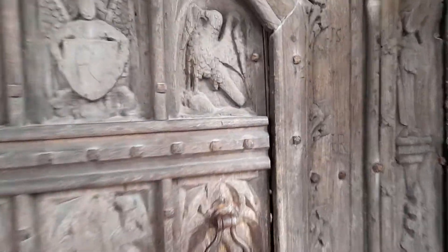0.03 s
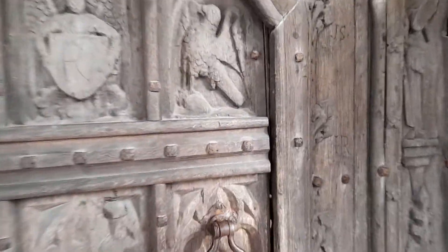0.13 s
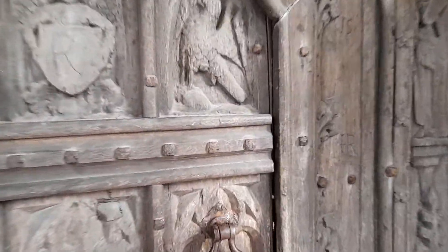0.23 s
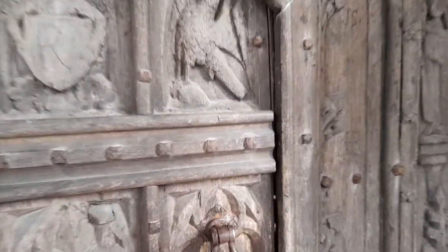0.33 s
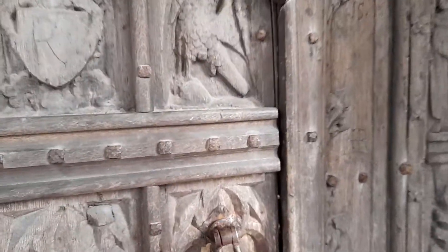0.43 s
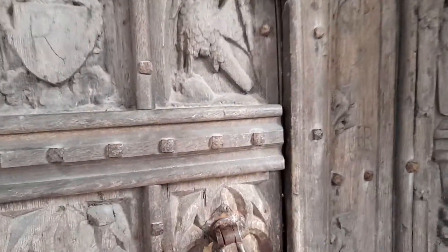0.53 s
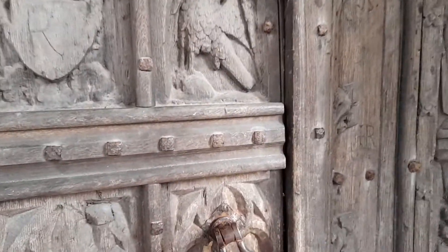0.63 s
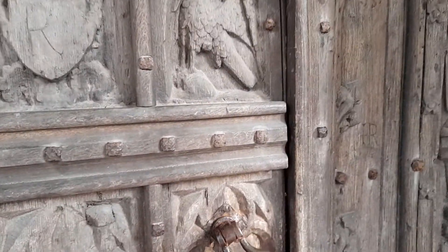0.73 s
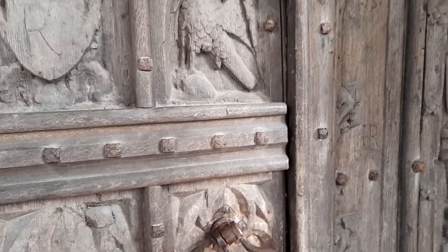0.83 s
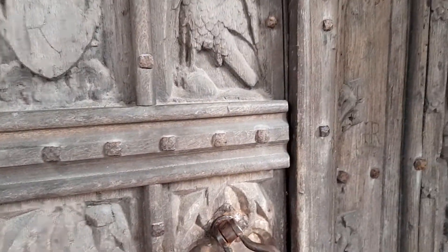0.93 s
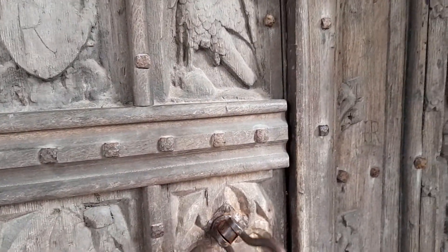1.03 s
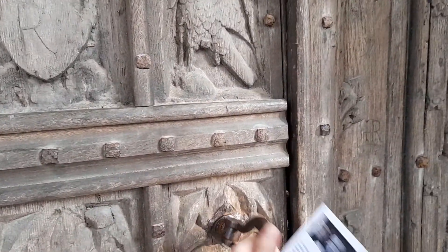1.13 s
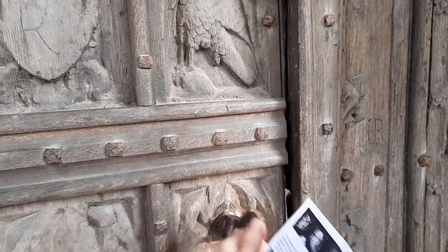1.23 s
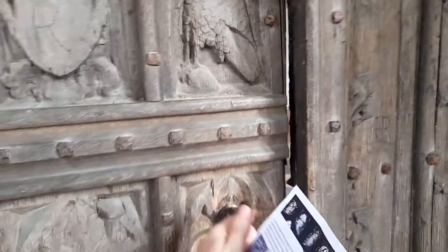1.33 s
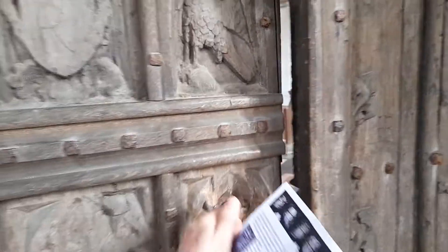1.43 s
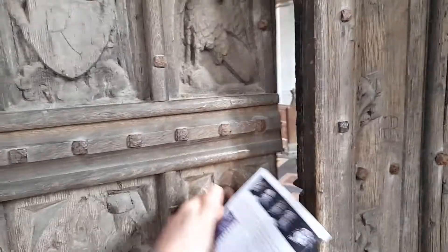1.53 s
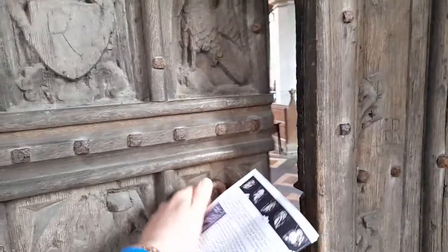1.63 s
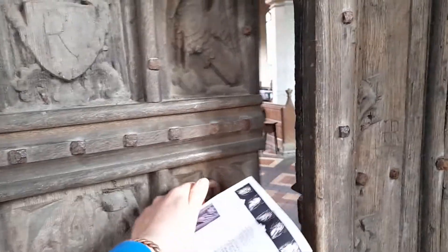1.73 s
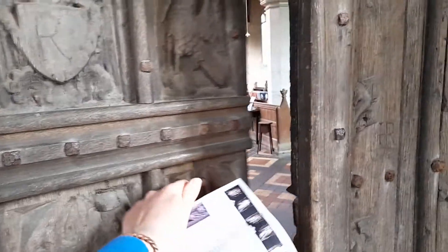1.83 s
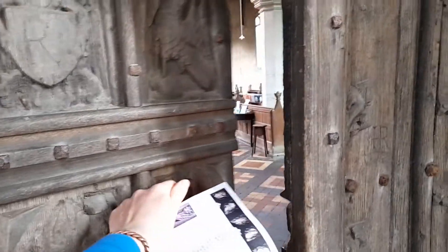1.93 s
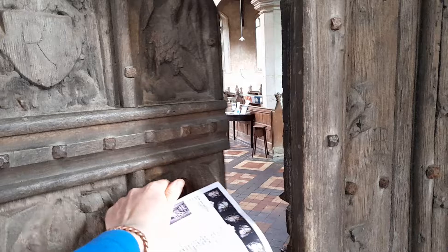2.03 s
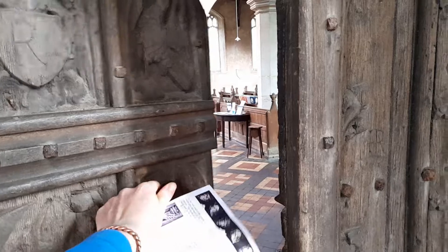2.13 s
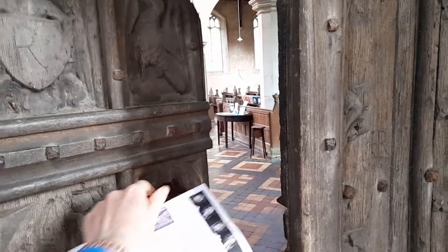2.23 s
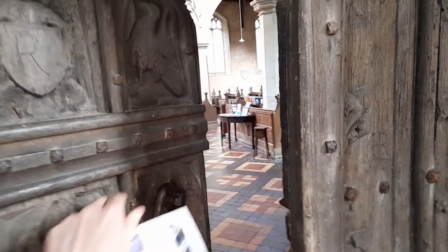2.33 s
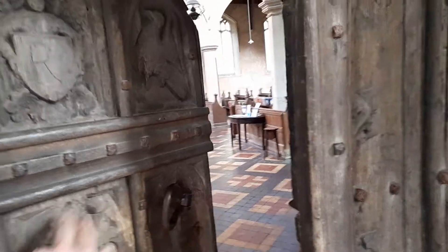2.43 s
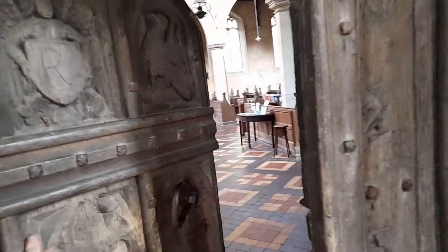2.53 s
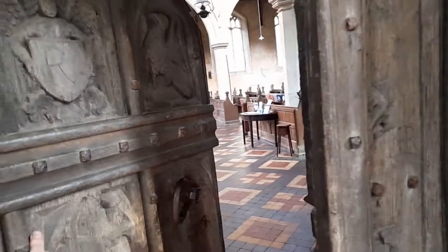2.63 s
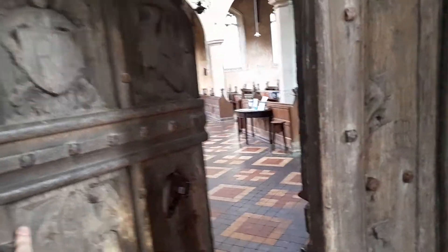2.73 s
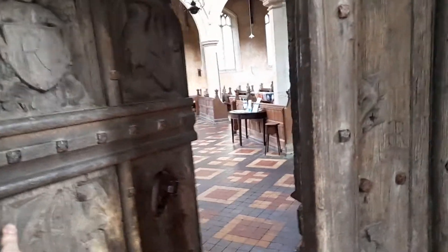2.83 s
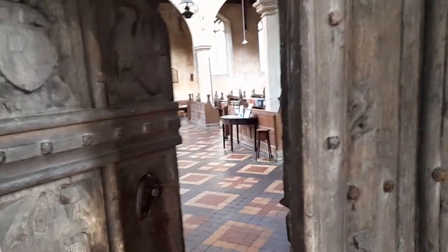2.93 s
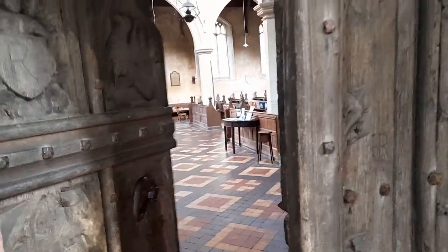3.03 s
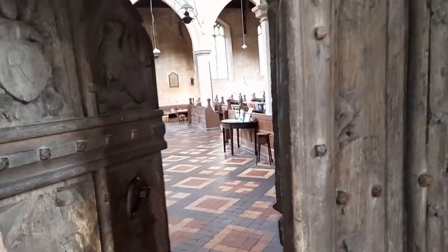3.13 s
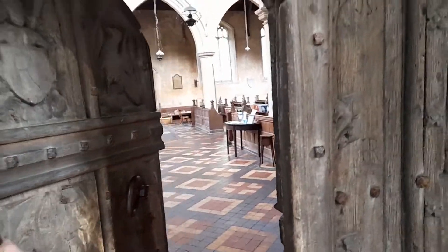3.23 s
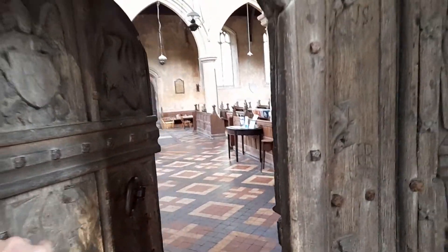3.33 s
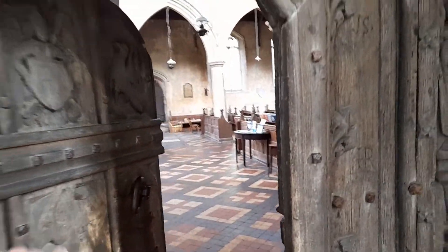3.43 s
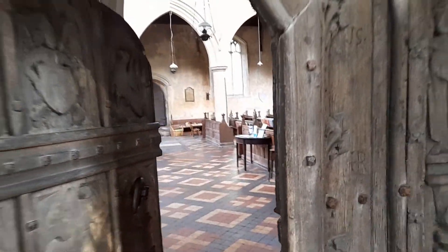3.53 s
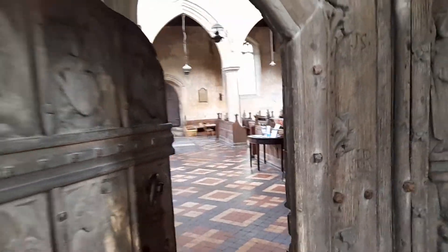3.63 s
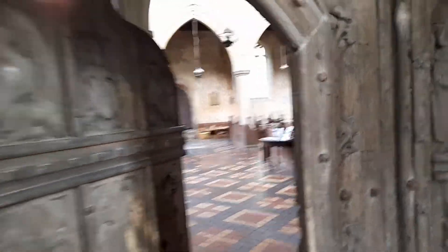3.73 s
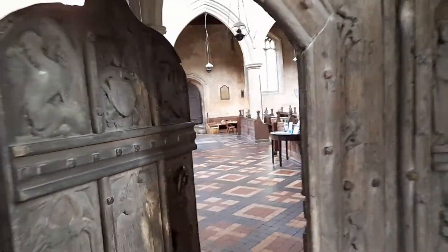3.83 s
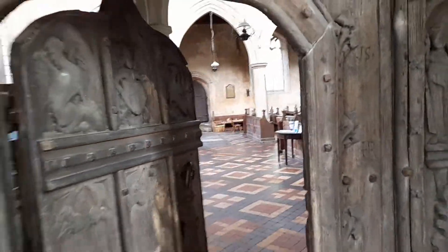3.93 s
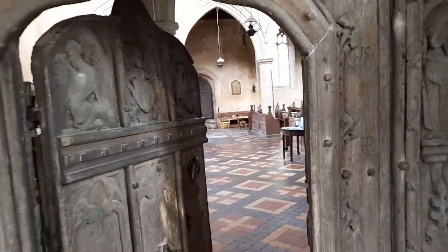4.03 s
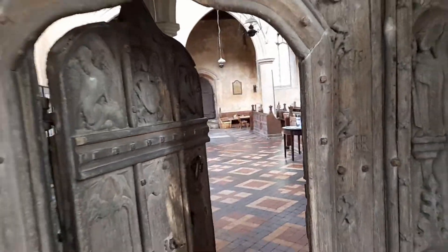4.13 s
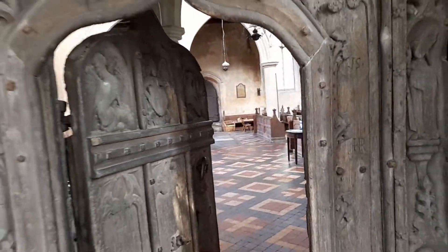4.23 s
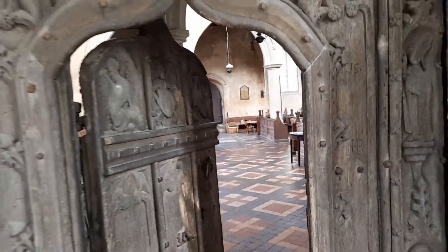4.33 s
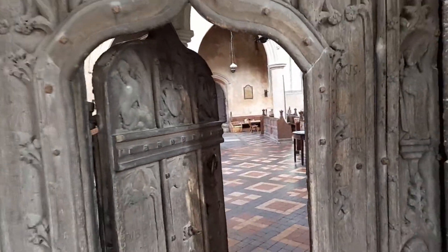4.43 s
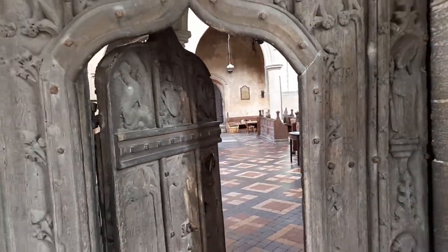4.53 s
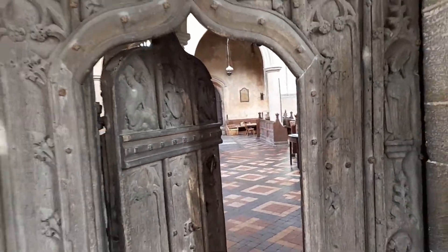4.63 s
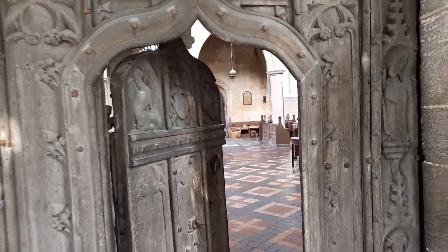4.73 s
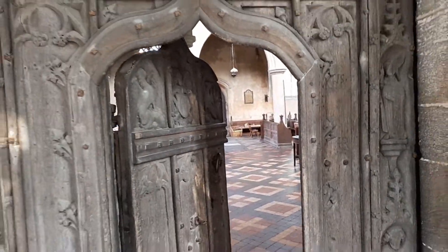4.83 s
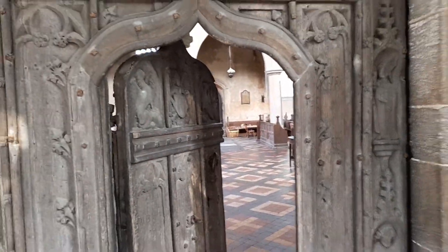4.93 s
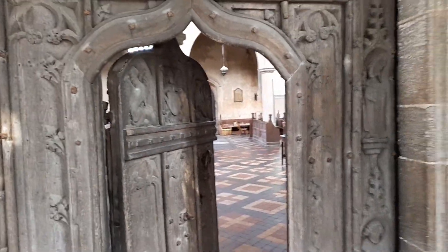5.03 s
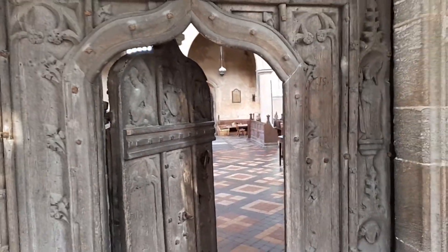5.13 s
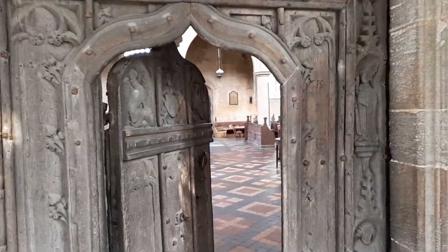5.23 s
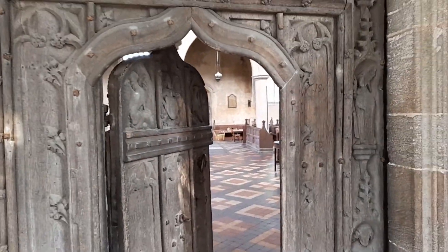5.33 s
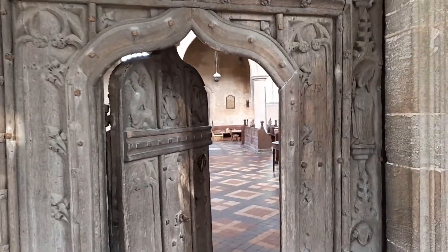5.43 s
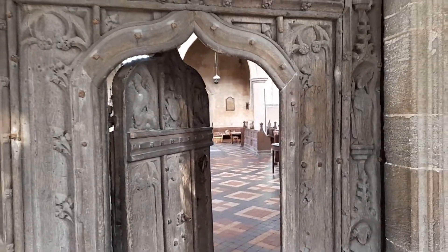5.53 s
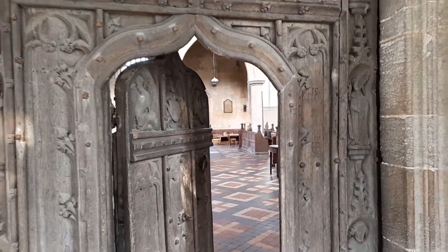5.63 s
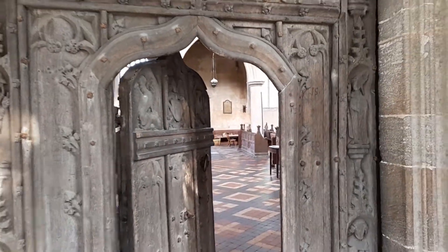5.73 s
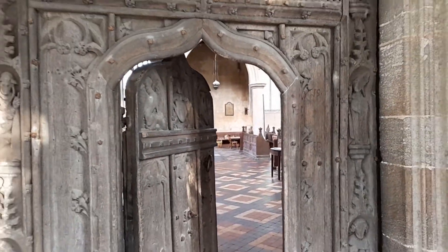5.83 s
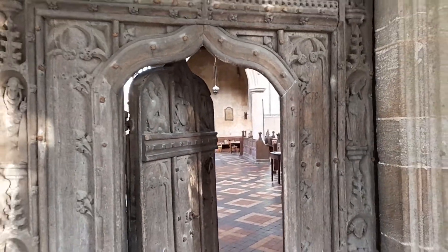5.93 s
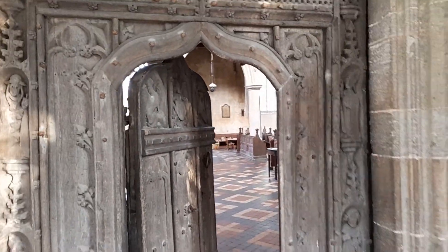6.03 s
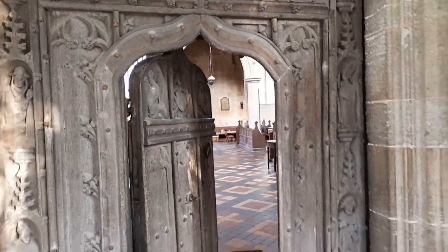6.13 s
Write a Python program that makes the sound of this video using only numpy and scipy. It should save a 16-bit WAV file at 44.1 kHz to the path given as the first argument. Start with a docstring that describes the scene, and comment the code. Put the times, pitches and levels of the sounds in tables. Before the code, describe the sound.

A heavy oak church door is opened, heard close by in a stone porch with a short echo and a faint outdoor hush. From 0.5 seconds the ironwork knocks lightly and sleeves rustle. At 1.1 seconds the ring handle gives a brief, slightly falling squeak, and at 1.2 the latch clacks up and rattles, the loudest sound. Smaller clanks come around 1.5 seconds, and a firmer one with a wooden thud at 2.2. The hinge groans low from about 1 to 2.4 seconds, then moans higher and fainter until 4. A deep rumble of air swells from 2 seconds, gusts around 4, and stays to the end. Clothes and a paper leaflet rustle faintly between 2.5 and 5 seconds, among small dry ticks and soft footfalls. Shoes scuff gritty stone with a thin squeal near 4.8, and a heel lands with a dull thump at 5.7.

```python
"""A heavy oak church door is unlatched and pushed open, heard from its stone porch.
The ironwork knocks and clanks, the ring handle squeaks as it sticks and slips, and the latch clacks up
and rattles. Each blow sounds both iron and oak, and the stone walls echo it. The hinge rubs and groans
under a swelling low rumble of air; clothes rustle and shoes scuff on the gritty floor."""
import sys
import numpy as np
from scipy import signal
from scipy.fft import rfft, irfft
from scipy.io import wavfile
from scipy.ndimage import uniform_filter1d

SR = 44100
rng = np.random.default_rng(int(sys.argv[2]) if len(sys.argv) > 2 else 0)


def int16_out(signal):
    """Quantize to a 16-bit WAV file."""
    q = np.round(np.clip(np.atleast_2d(signal).T, -1, 1) * 32767)
    wavfile.write(sys.argv[1], SR, q.astype(np.int16))


N = 272185
TIME = np.arange(N) / SR

# tone shapes, saying how strong each pitch of a noise is: f/Hz, level/dB
HUSH_SHAPE = [(100, -4.5), (400, -1), (700, -16.5), (1300, -24.5), (2500, -29.5), (6500, -31),
              (15000, -35.5)]
DRAUGHT_SHAPE = [(30, -19.5), (48, -5.5), (105, 0), (130, -4.5), (350, -29), (600, -48.5), (1500, -72)]
CRACK_SHAPE = [(300, -29.5), (900, 0.5), (6500, 3), (12000, -3.5), (16000, -12)]
PLANK_SHAPE = [(150, -21.5), (340, 2), (830, 0.5), (1600, -13), (4000, -47.5)]
RUSTLE_SHAPE = [(500, -7.5), (2600, -0.5), (4500, 1), (10000, -0.5), (15000, -8)]
RASP_SHAPE = [(700, -6.5), (1600, 3.5), (9000, -41)]
GRIT_SHAPE = [(300, 5), (1200, -1.5), (2500, -12), (7000, -11), (15000, -25)]
# how alike the left and right sides are: f/Hz, likeness (1 = the same)
LIKENESS = [(130, 0.97), (290, 0.94), (640, 0.43), (1400, -0.095)]
# gusts of the rumble: peak t/s, spread/s, level/dB, extra for the deep air/dB, extra for the roar/dB
GUSTS = [(1.329, .15, -49, 5, 2), (2.313, 0.32, -39.5, -23.5, -0.5), (2.642, .1, -35.5, -6, 0.5),
         (3.045, 0.47, -36, -8, 1), (3.524, 0.18, -32.5, -0.5, -1.5), (4.076, 0.2, -27.5, 5.5, 3),
         (4.64, 0.28, -43.5, 14.5, -14.5), (5.509, 0.18, -30, -2, 5.5), (5.889, 0.22, -29, -10, -6.5)]
# low and higher notes that moving air stirs in the porch: f/Hz, width/Hz, level/dB
BOOM_NOTES = [(140.8, 21.3, -0.5), (119.5, 19.3, -2), (192, 50, -10)]
ROAR_NOTES = [(277.5, 52.6, 3.5), (307.2, 33.5, 4), (354.3, 55, -4)]
# modes, the notes a struck thing rings with: f/Hz, level/dB, t60/s (the time to fade by 60 dB)
RING_MODES = [(1917, 1.486, 0.031), (2168, -1, 0.02), (3750, 0.88, 0.008), (5030, 0, 0.0038)]
PLATE_MODES = [(1090, -3.5, 0.022), (1217, -1.5, 0.021)]
OAK_MODES = [(150, -22.5, 0.36), (286, -1, 0.077), (358, 3, 0.047), (420, 3.5, 0.037), (722, -3, 0.056),
             (839, 0, 0.032)]
LATCH_MODES = [(1170, -12, 0.022), (2040, -5, 0.035), (2110, -1, 0.025), (3770, -2.5, 0.018),
               (5050, -2.5, 0.016), (7040, -3.5, 0.012), (7400, 3, 0.011), (11600, 0, 0.0036)]
# knocks and clanks of the door's ironwork; the row at 1.208 s is the stone wall throwing back the latch's blow:
# # t/s, iron level/dB, brightness/(dB per octave), oak level/dB, boost of the plate's notes/dB
IRON_KNOCKS = [(.521, -46.5, 2, -43, 14), (0.784, -50, -8, -46, 8), (.852, -51, -10.5, -44.5, 11),
               (1.208, -36.5, -14, -42.5, 10), (1.459, -53.5, -14.5, -36.5, -6), (1.472, -43, -6, -40, 0.5),
               (1.5225, -40, -2, -42, -13), (1.5502, -44, -4, -49, 6), (2.229, -31.5, -3, -33, -8),
               (2.2338, -34, -2.5, -29, -2), (2.237, -30, -12.5, -30.5, 1), (3.348, -58, -15, -47.5, 10)]
# strokes of sleeves and a paper leaflet: peak t/s, level/dB, rise/s, fade/s, brightness/(dB per octave)
RUSTLES = [(0.656, -57, 0.034, 0.035, -2.5), (0.801, -55, 0.037, 0.073, -3),
           (2.48, -59.5, 0.038, 0.16, -2.5), (3.292, -58, 0.03, 0.18, -2), (3.63, -57, 0.077, 0.07, -4),
           (4.071, -54, 0.024, 0.13, 0), (4.18, -54.5, 0.029, 0.048, 0), (4.31, -57, 0.054, 0.14, 0),
           (4.465, -55.5, 0.03, 0.077, -2.5), (4.829, -62.5, 0.13, 0.08, -1.5)]
# thin squeals of a turning sole: peak t/s, spread/s, f/Hz, glide/(Hz per s), width/Hz, level/dB
SOLE_SQUEALS = [(.67, 0.1, 2636, -1500, 722, -67), (4.86, 0.087, 2897, -300, 287, -63.5)]
# small dry ticks: t/s, level/dB, brightness/(dB per octave)
TICKS = [(0.83, -49, 9), (.954, -55.5, -3), (1.063, -53, -1), (1.599, -38.5, -1), (2.019, -51, 6.5),
         (2.217, -45, -2), (2.648, -51.5, 2), (2.814, -50, -3), (3.585, -48, -0.5), (3.683, -47.5, -1.5),
         (4.065, -49, 1)]
# the course of the handle's squeak: t/s, f/Hz, level/dB
SQUEAK_PATH = [(1.088, 711.4, -63.5), (1.098, 684.5, -55.5), (1.127, 631, -46.5), (1.139, 619, -33),
               (1.150, 611, -25.5), (1.170, 603, -25.5)]
# the tones in that squeak: multiple of the pitch, level/dB
SQUEAK_HARMONICS = [(1, -3.5), (2, -18.5), (3, -31)]
# blows of the latch bar: t/s, iron level/dB, brightness/(dB per octave), oak level/dB
LATCH_BLOWS = [(1.17, -16, 1, -22.5), (1.173, -18.5, 4, -17.5), (1.1770, -16, 3.5, -29.5),
               (1.1789, -11, 6.5, -25.5), (1.1805, -24, 7, -22)]
# moans of the hinge: peak t/s, spread/s, f/Hz, glide/(Hz per s), width/Hz, level/dB
HINGE_MOANS = [(1.5, 0.53, 147, 3, 13, -43.5), (2.09, 0.22, 142, -25, 14, -37),
               (2.8, 0.4, 423.4, -15, 87, -46), (3.331, 0.14, 608, -27.5, 35, -57.5),
               (3.842, 0.19, 572, -180, 120, -55)]
# shoes on stone: t/s, level/dB, rise/s, fade/s, note f/Hz, note over grit/dB, sharpness (f over width)
SCUFFS = [(2.811, -54.5, 0.0033, 0.07, 1185, -12, 0.53), (4.049, -60, 0.0036, 0.13, 4140, 3.5, 5.5),
          (4.803, -47, 0.016, 0.037, 2080, -1.5, 1), (4.905, -51, 0.019, 0.053, 1913, -4.5, 1.2),
          (5.654, -44, 0.011, 0.09, 730, -2.5, 2), (6.034, -56.5, 0.0011, 0.26, 1390, -1, 0.56)]
# the notes in a heel's knock: f/Hz, width/Hz, level/dB, fade/s
HEEL_NOTES = [(334.2, 225, -2.5, 0.066), (862, 92, -12.5, 0.046), (1266, 400, -15, 0.013)]
# body weight settling on the floor: t/s, level/dB, f/Hz, fade/s
THUMPS = [(3.319, -27, 75.2, 0.023), (4.389, -27, 55.9, .03), (4.825, -38, 372, 0.022),
          (5.693, -16, 143.4, 0.012), (5.702, -26, 273.3, 0.012)]
# the echo of the stone porch: f/Hz, t60/s, level/dB
PORCH_ECHO = [(152, 0.15, -1), (489, 0.72, -2), (1060, 0.52, -4.5), (2380, 0.61, -4), (6360, 0.48, -9.5),
              (15000, .25, -7)]
# the microphone's tone shape: f/Hz, level/dB
MICROPHONE_SHAPE = [(15, -45), (42, 1), (6900, 3.5), (7500, -4.5), (8100, -9.5), (9200, -6.5),
                    (11500, -0.5)]


def amp(db):
    """Turns decibels into a factor to multiply by."""
    return 10 ** (np.asarray(db) / 20)


def evened(x):
    """Scales a sound to an average power of 1."""
    return x / np.sqrt(np.mean(x ** 2) + 1e-20)


def steadied(x, span_s):
    """Evens out swells slower than span_s."""
    power = uniform_filter1d((x ** 2).mean(0), max(int(span_s * SR), 2))
    return x / np.sqrt(abs(power) + 1e-20)


def unit_hit(x):
    """Scales a hit to the energy of 3 ms at level 1."""
    return x / np.sqrt(np.mean(np.sum(x ** 2, -1)) / (.003 * SR))


def noise(samples):
    return rng.standard_normal((2, samples))


def wobble(samples, smooth_samples):
    """A smooth random wiggle."""
    return evened(uniform_filter1d(rng.standard_normal(samples), smooth_samples))


def swell(s, spread_s):
    """A bell-shaped rise and fall of height 1 around time s."""
    return np.exp(-.5 * ((TIME - s) / spread_s) ** 2)


def add(mix, s, sound):
    part = mix[:, max(round(s * SR), 0):][:, :sound.shape[-1]]
    part += sound[..., :part.shape[1]]


def panned(x, left_db):
    return x * amp([[left_db / 2], [-left_db / 2]])


def frequencies(x):
    return np.fft.rfftfreq(x.shape[-1], 1 / SR)


def value_at(points, hz):
    """Reads between a table's rows, giving each octave equal room."""
    f, value = np.transpose(points)
    return np.interp(np.log(hz + 1), np.log(f + 1), value)


def colour(x, shape):
    """Filters a sound by a tone shape."""
    return irfft(rfft(x) * amp(value_at(shape, frequencies(x))), x.shape[-1])


def pair(x):
    """Makes left and right alike in the bass, where long waves reach both sides together."""
    a, b = rfft(x)
    same = np.clip(value_at(LIKENESS, frequencies(x)), -1, 1)
    mid, side = a * np.sqrt((1 + same) / 2), b * np.sqrt((1 - same) / 2)
    return irfft(np.array([mid + side, mid - side]), x.shape[-1])


def resonate(x, hz, width):
    """Lets through a band of pitches around hz."""
    r = np.exp(-np.pi * width / SR)
    pole = r * np.exp(2j * np.pi * hz / SR)
    return 2 * signal.lfilter([(1 - r) ** 2], [1, -2 * pole, pole ** 2], x).real


def stirred(notes):
    """Swirling air sounds the notes of the porch."""
    swirl = pair(noise(N))
    return steadied(sum(amp(db) * resonate(swirl, hz, width) for hz, width, db in notes), span_s=0.072)


def wind(shut_db, open_db, gust_db=0, delay_s=0, deep=False, roar=False, swing_s=(1.5, 4.4)):
    """The strength of one part of the rumble: a draught that grows as the door swings, plus gusts."""
    power = amp(np.interp(TIME, swing_s, (shut_db, open_db))) ** 2
    for s, spread_s, db, deep_db, roar_db in GUSTS:
        peak = amp(db + gust_db + deep * deep_db + roar * roar_db)
        power += (peak * swell(s + delay_s, spread_s)) ** 2
    return np.sqrt(power)


def air(split_hz=62, hush_db=-52.5):
    """A deep rumble swells and booms in the porch, over the hush of the churchyard."""
    draught = steadied(colour(pair(noise(N)), DRAUGHT_SHAPE), span_s=0.27)
    lowest = irfft(rfft(draught) / (1 + (frequencies(draught) / split_hz) ** 8), N)
    # each gust sinks in pitch: the roar comes early, the lowest part late
    deep = (draught - lowest) * wind(-47.5, -39, deep=True)
    deep += lowest * wind(-48.5, -28.5, gust_db=-1, delay_s=0.24, deep=True)
    boom = stirred(BOOM_NOTES) * wind(-55, -35.5)
    roar = stirred(ROAR_NOTES) * wind(-57.5, -41.5, gust_db=-10, delay_s=-0.093, roar=True)
    hush = evened(colour(pair(noise(N)), HUSH_SHAPE))
    return panned(deep + boom + roar, left_db=-0.83) + amp(hush_db) * hush


def ringing(modes, stereo):
    """A struck thing's notes die away; higher ones are more out of step between the ears."""
    t = np.arange(SR // 3) / SR
    offsets = rng.uniform(-2.1, 1, (len(modes), 2, 1))
    out = np.zeros((2, len(t)))
    for k, (hz, db, t60) in enumerate(modes):
        phase = offsets[k] * min(stereo * hz / 1000, np.pi)
        out += (-1) ** k * amp(db - 60 * t / t60) * np.sin(2 * np.pi * hz * t + phase)
    return unit_hit(out)


def restruck(modes):
    """Loose iron is struck at a new spot every time, which shifts its notes a little."""
    return [(hz * (1 + .025 * rng.standard_normal()), db + 2 * rng.standard_normal(), t60)
            for hz, db, t60 in modes]


def crack(t60, shape=CRACK_SHAPE):
    """Two hard things meet in a short burst of noise."""
    t = np.arange(SR // 3) / SR
    return unit_hit(colour(pair(noise(len(t))), shape) * amp(-60 * t / t60))


def tilted(hit, bright_db):
    """Brightens or dulls a hit by bright_db per octave above 400 Hz, like a harder or softer blow."""
    slope = amp(bright_db * np.log2(np.clip(frequencies(hit), 400, None)))
    return unit_hit(irfft(rfft(hit) * slope)[:, :hit.shape[1] // 2])


def oak_thud():
    """The oak door answers a blow with a few low notes and a dull knock of its planks."""
    return unit_hit(ringing(OAK_MODES, stereo=1.2) + amp(1) * crack(t60=0.03, shape=PLANK_SHAPE))


def iron_knocks(hard_above_db=-38.5):
    """The door's ironwork knocks and clanks; the metal rings briefly and the oak behind it thuds."""
    out = np.zeros((2, N))
    for s, db, bright_db, oak_db, plate_db in IRON_KNOCKS:
        plate = [(hz, level + plate_db, t60) for hz, level, t60 in PLATE_MODES]
        clink = ringing(restruck(list(RING_MODES) + plate), stereo=.4)
        crack_db = -2 + .95 * max(db - hard_above_db, 0)  # hard knocks crack, soft ones clink
        knock = clink + amp(crack_db) * crack(t60=.03)
        add(out, s, amp(db) * tilted(knock, bright_db))
        add(out, s, amp(oak_db) * oak_thud())
    return out


def patchy(hiss, patch_db=3.5):
    """Breaks a hiss into grains about 10 ms long and 700 Hz wide."""
    cells = signal.stft(hiss, nperseg=256)[2]
    patches = uniform_filter1d(rng.standard_normal(cells.shape[1:]), size=4, axis=0)
    patches = evened(uniform_filter1d(patches, size=4, axis=1))
    grainy = signal.istft(cells * amp(patch_db * patches), nperseg=256)[1]
    return evened(grainy[:, :hiss.shape[1]])


def clothes(clump_db=1.0, crinkle_db=-8, crinkles_per_s=400):
    """Cloth rubs in small clumps and paper crinkles in tiny snaps; each stroke swells and dies away."""
    out, t = np.zeros((2, N)), np.arange(-SR // 5, SR * 4 // 5) / SR
    for s, db, rise_s, fade_s, bright_db in RUSTLES:
        clumps = amp(clump_db * wobble(len(t), 250))
        snaps = evened(noise(len(t)) * (rng.random(len(t)) < crinkles_per_s / SR))
        shape = [(hz, level + bright_db * np.log2(hz)) for hz, level in RUSTLE_SHAPE]
        hiss = patchy(noise(len(t))) + amp(crinkle_db) * snaps
        rub = evened(colour(hiss, shape) * clumps)
        stroke = np.exp(np.where(t < 0, -.5 * (t / rise_s) ** 2, -t / fade_s))
        add(out, s + t[0], amp(db) * rub * stroke)
    return out


def rubbing_tones(rows):
    """Uneven rubbing makes fuzzy tones that swell, glide and fade."""
    out = np.zeros((2, N))
    for s, spread_s, hz, glide, width, db in rows:
        r = np.exp(-np.pi * width / SR)
        flutter = signal.lfilter([1], np.poly([r, r]), noise(N) + 1j * noise(N))
        cycles = np.cumsum(hz + glide * (TIME - s)) / SR
        tone = (flutter * np.exp(2j * np.pi * cycles)).real
        out += amp(db) * swell(s, spread_s) * steadied(tone, span_s=.12)
    return pair(out)


def sole_squeals():
    """A sole turns on the stone and squeals thinly."""
    return rubbing_tones(SOLE_SQUEALS)


def ticks():
    """Small dry ticks with no note."""
    out = np.zeros((2, N))
    for s, db, bright_db in TICKS:
        add(out, s, amp(db) * tilted(crack(t60=.022), bright_db))
    return out


def handle_squeak(waver=0.017, shimmer_db=1.2, rasp_db=-14.5, rasp_at_s=1.153):
    """The handle's dry shaft sticks and slips fast enough to sing, and rasps before the latch jumps."""
    times, hz, db = np.transpose(SQUEAK_PATH)
    pitch = np.interp(TIME, times, hz) * (1 + waver * wobble(N, 150))
    cycles = np.cumsum(pitch) / SR
    tone = sum(amp(level) * np.sin(2 * np.pi * round(k) * cycles) for k, level in SQUEAK_HARMONICS)
    tone = evened(tone) * amp(shimmer_db * wobble(N, 150))
    slips = evened(colour(noise(N) * np.exp(-3 * (cycles % 1)), RASP_SHAPE))  # one puff per slip
    rasp = amp(rasp_db) * (.25 + swell(rasp_at_s, spread_s=0.0027)) * slips
    sounding = (TIME > times[0]) & (TIME < times[-1])
    return (tone + rasp) * amp(np.interp(TIME, times, db)) * sounding


def latch(crack_db=4, bounces=24, rattle_db=-44.5, rattle_s=.2, rattle_fade_s=0.057):
    """The latch bar clacks up and thuds into the oak, then rattles loosely in its catch."""
    out = np.zeros((2, N))
    for s, db, bright_db, oak_db in LATCH_BLOWS:
        clack = ringing(LATCH_MODES, stereo=0.47) + amp(crack_db) * crack(t60=0.011)
        add(out, s, panned(amp(db) * tilted(clack, bright_db), left_db=-2))
        add(out, s, amp(oak_db) * oak_thud())
    last_blow_s = LATCH_BLOWS[-1][0]
    for after_s in rattle_s * (np.arange(bounces) + rng.random(bounces)) / bounces:
        bounce = ringing(restruck(LATCH_MODES), stereo=1) + 2 * amp(crack_db) * crack(t60=.03)
        strength = amp(rattle_db) * np.exp(-after_s / rattle_fade_s)
        add(out, last_blow_s + after_s, strength * unit_hit(bounce))
    return out


def hinge():
    """The hinge rubs: it groans low as the door starts to move, then moans higher and fainter."""
    return rubbing_tones(HINGE_MOANS)


def pressure(t, rise_s, fade_s):
    """The push of a shoe builds up and fades."""
    return (1 - np.exp(-t / rise_s)) * (1 - t / t[-1]) * np.exp(-t / fade_s)


def footsteps(grain_db=2.0, heel_at_s=5.656, heel_db=-28.5):
    """Soles drag over gritty stone, one heel knocks, and body weight lands in dull thumps."""
    out, t = np.zeros((2, N)), np.arange(SR // 2) / SR
    for s, db, rise_s, fade_s, hz, note_db, sharpness in SCUFFS:
        grains = amp(grain_db * wobble(len(t), 100))
        grit = pair(noise(len(t))) * grains
        note = evened(resonate(grit, hz, hz / sharpness))
        scuff = evened(colour(grit, GRIT_SHAPE)) + amp(note_db) * note
        add(out, s, amp(db) * scuff * pressure(t, rise_s, fade_s))
    for hz, width, db, fade_s in HEEL_NOTES:
        knock = evened(resonate(pair(noise(len(t))), hz, width))
        add(out, heel_at_s, amp(heel_db + db) * knock * pressure(t, 0.0024, fade_s))
    for s, db, hz, fade_s in THUMPS:
        weight = t / fade_s * np.exp(1 - t / fade_s)
        add(out, s, amp(db) * weight * np.sin(2 * np.pi * hz * t))
    return out


def porch(x, build_s=0.008, echoes_per_s=5000):
    """Close stone walls throw back a blur of echoes; the middle pitches last longest."""
    echoes = noise(SR) * (rng.random((2, SR)) < echoes_per_s / SR)
    echoes = evened(pair(echoes)) * (1 - np.exp(-(TIME[:SR] / build_s) ** 2))
    hz, t, cells = signal.stft(echoes, SR, nperseg=256)
    walls = np.array(PORCH_ECHO)
    t60 = value_at(walls[:, [0, 1]], hz)[:, None]
    db = value_at(walls[:, [0, 2]], hz)[:, None]
    unit_energy = np.sqrt(2 * np.log(1000) / (t60 * SR))
    tail = signal.istft(cells * unit_energy * amp(db - 60 * t / t60), SR, nperseg=256)[1]
    return signal.fftconvolve(x, tail, axes=1)[:, :N]


def scene():
    """Iron, ticks and shoes echo in the porch, the close squeak less; hinge, air and cloth do not."""
    near = latch() + iron_knocks() + ticks() + footsteps() + sole_squeals()
    squeak = handle_squeak()
    echo = porch(near + amp(-7.5) * squeak)
    return near + amp(-4.0) * squeak + echo + hinge() + air() + clothes()


def record(dry):
    """The microphone drops the deepest bass, dips the treble, rounds peaks and cuts the very top."""
    ceiling, top_hz = .85, 15900
    rounded = ceiling * np.tanh(colour(dry, MICROPHONE_SHAPE) / ceiling)
    low_pass = signal.firwin(401, top_hz, window=("kaiser", 8), fs=SR)
    return signal.oaconvolve(rounded, low_pass[None], "same")


dry = scene()
out = record(dry)
int16_out(out)
```